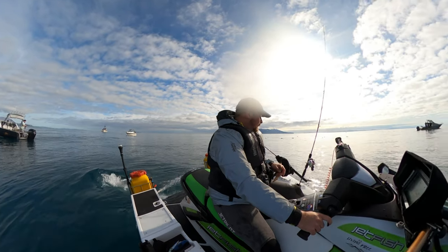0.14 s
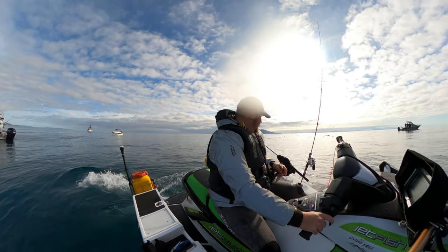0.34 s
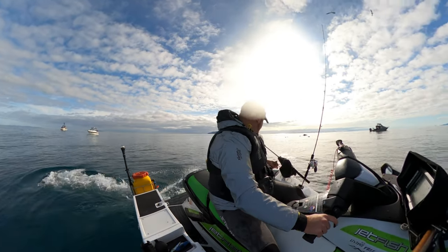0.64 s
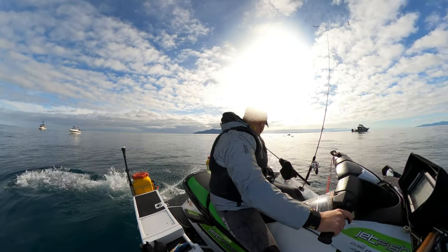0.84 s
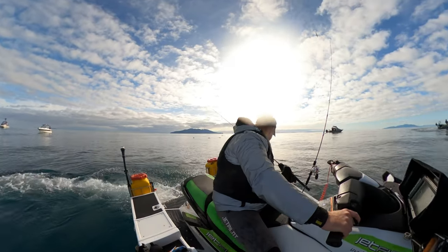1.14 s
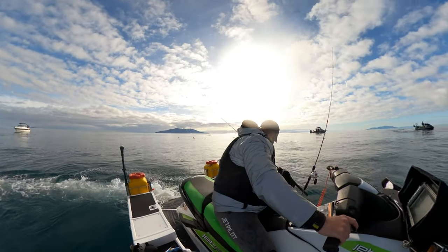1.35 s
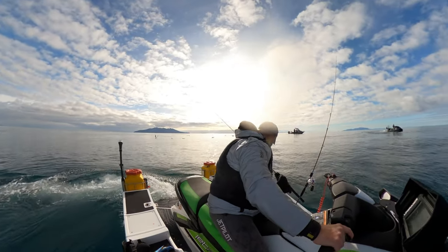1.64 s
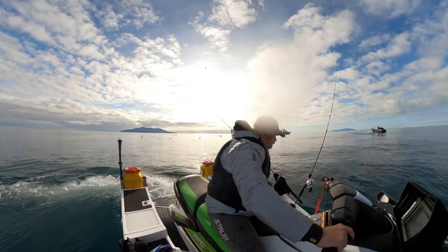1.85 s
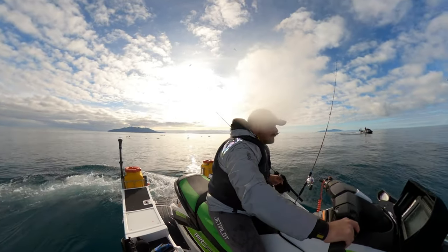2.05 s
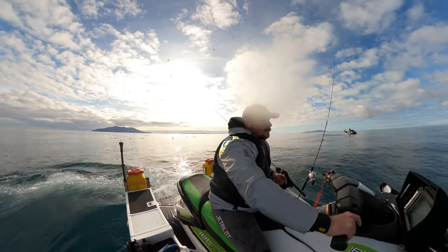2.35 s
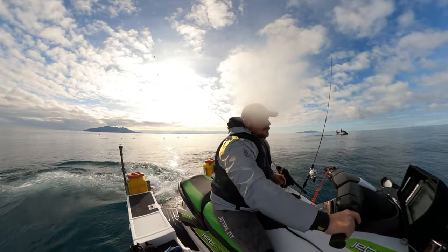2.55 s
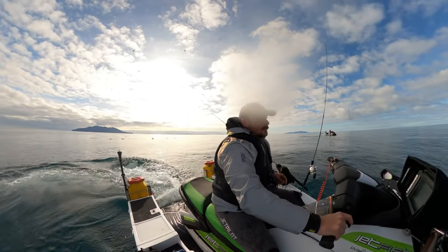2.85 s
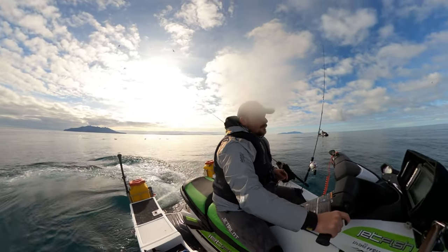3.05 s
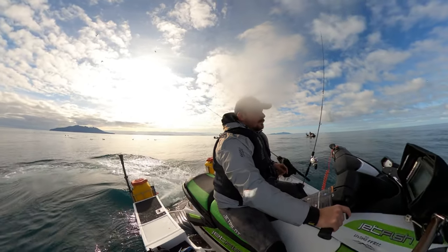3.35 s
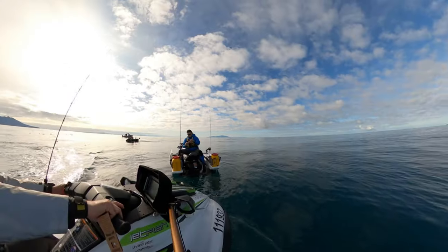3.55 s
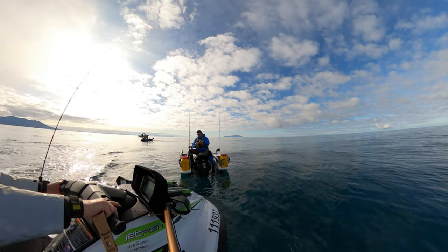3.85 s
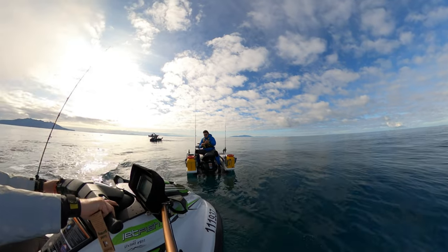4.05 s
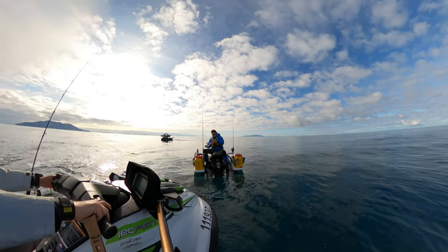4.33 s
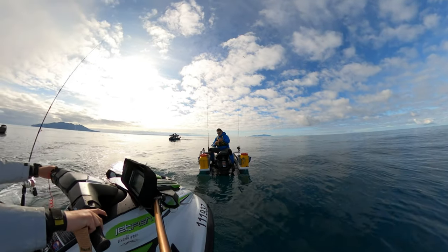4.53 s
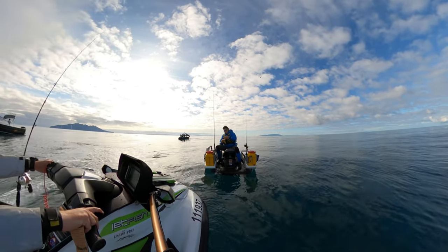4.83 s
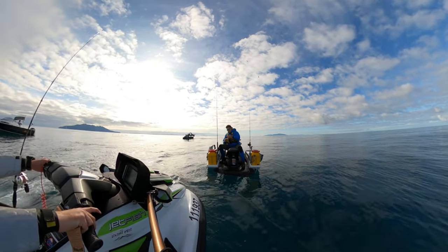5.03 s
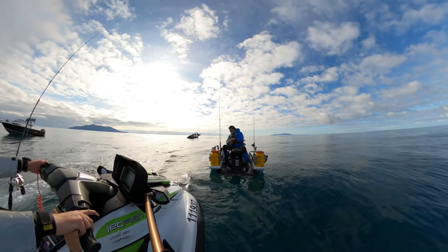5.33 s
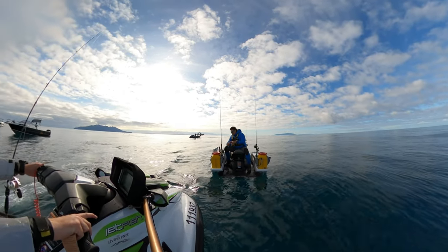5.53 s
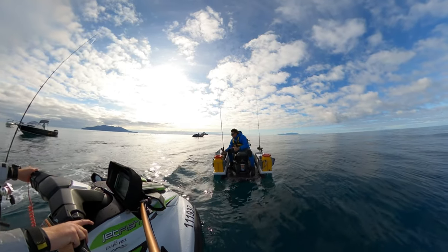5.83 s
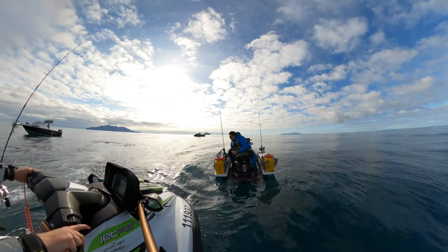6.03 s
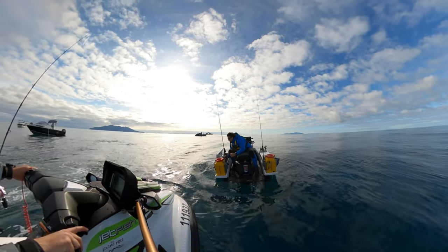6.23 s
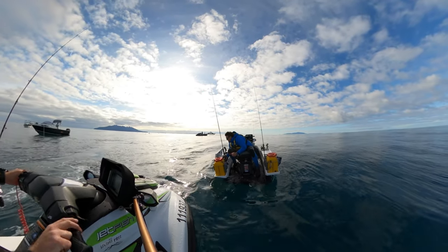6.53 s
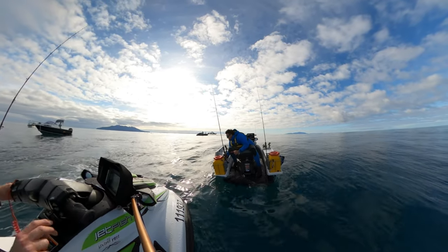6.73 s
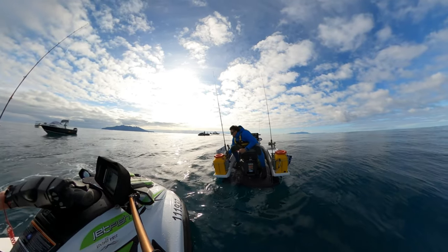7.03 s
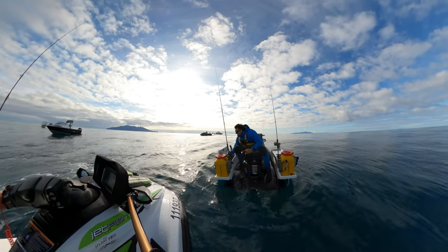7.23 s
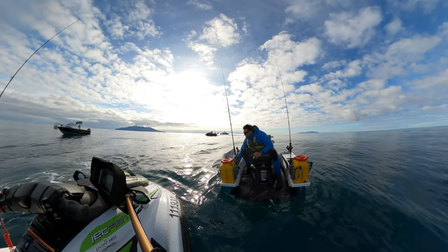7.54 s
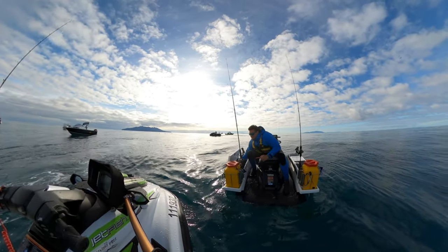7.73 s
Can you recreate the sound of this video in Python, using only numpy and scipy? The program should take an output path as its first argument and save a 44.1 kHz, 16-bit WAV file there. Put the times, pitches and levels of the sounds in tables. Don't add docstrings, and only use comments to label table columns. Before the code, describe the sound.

Close on open water, a jet-driven craft hums loudly, slows, thumps a wave, surges, then fades into a low gurgling idle with small hull slaps.

```python
import sys
import numpy as np
from scipy import signal
from scipy.fft import rfft, irfft, next_fast_len
from scipy.io import wavfile
from scipy.ndimage import uniform_filter1d

SR = 44100
rng = np.random.default_rng(int(sys.argv[2]) if len(sys.argv) > 2 else 0)


def wrap_up_sound(samples):
    columns = np.atleast_2d(samples).T
    tamed = np.clip(columns, -1, 1)
    steps = np.round(tamed * 32767).astype(np.int16)
    wavfile.write(sys.argv[1], SR, steps)


def boost(x):
    u = np.asarray(x, float) / 20
    return 10 ** u


N = 347508
TIME = np.arange(N) / SR


def rms_one(x):
    return x / np.sqrt(np.mean(x ** 2) + 1e-20)


def in_time(rows):
    seconds, *columns = np.transpose(rows)
    return [np.interp(TIME, seconds, column) for column in columns]


def drift(rate_hz):
    r = np.exp(-80 * np.pi * rate_hz / SR)
    noise = rng.standard_normal(N // 40 + 2002)
    slow = signal.lfilter([1], [1, -2 * r, r * r], noise)[2000:]
    return np.interp(np.arange(N) / 40, np.arange(len(slow)), rms_one(slow))


def ring(x, hz, width_hz):
    r = np.exp(-np.pi * width_hz / SR)
    top = np.array([1, 0, -1]) * (1 - r * r) / 2
    return signal.lfilter(top, [1, -2 * r * np.cos(2 * np.pi * hz / SR), r * r], x)


def passed(x, low_hz, high_hz, order=2):
    return signal.sosfilt(signal.butter(order, [low_hz, high_hz], "band", fs=SR, output="sos"), x)


def coloured(spectrum, size, patchy_db=0):
    hz, db = np.transpose(spectrum)
    edges = np.geomspace(hz[0], hz[-1], int(3.5 * np.log2(hz[-1] / hz[0])))
    white = rng.standard_normal((2, size))
    out = 0
    for k, (low, high) in enumerate(zip(edges, edges[1:])):
        level_db = np.interp(np.log(low * high) / 2, np.log(hz), db)
        flicker_db = patchy_db * drift(14)[:size]
        out = out + boost(level_db + flicker_db) * passed(white[k % 2], low, high)
    return rms_one(out)


# time in seconds, hiss level in dB.
GRILLE_AIR = [(0.0, -76), (1.25, -76), (2.0, -80), (2.57, -76), (3.25, -75.5), (4.25, -90), (4.72, -87.5),
              (5.3, -88.5), (6.61, -80.5), (7.88, -82)]


def grille():
    hiss_db = in_time(GRILLE_AIR)[0]
    white = rng.standard_normal(N)
    cavity = boost(1.5 * (hiss_db + 74)) * ring(white, 12400, 1100)
    hiss = passed(white, 8000, 13000) + cavity
    return boost(hiss_db + 2.5 + 1.2 * drift(9)) * rms_one(hiss)


# time of the peak in seconds, peak level in dB.
WIND_GUSTS = [(1.45, -43), (1.659, -24), (2.1, -32), (3.2, -40), (3.75, -30.5), (4.2, -29), (4.55, -23.5),
              (4.851, -26), (5.15, -27.5), (5.38, -31.5), (5.63, -39), (6.0, -31.5), (6.2, -45),
              (7.35, -30), (7.6, -39)]
CALM_DB, GUST_RISE_S, GUST_FALL_S = -43.5, 0.12, 0.14


def wind():
    power = boost(2 * CALM_DB)
    for s, db in WIND_GUSTS:
        spread_s = np.where(TIME < s, GUST_RISE_S, GUST_FALL_S)
        power = power + boost(2 * db) * np.exp(-((TIME - s) / spread_s) ** 2)
    rumble = boost(4.3 * drift(4.1)) * passed(rng.standard_normal(N), 21, 52)
    return np.sqrt(power) * rms_one(rumble)


# pitch in Hz, level in dB per Hz.
SPRAY_COLOUR = [(900, -9), (1300, -0.5), (1700, -2), (3000, -8), (4700, -13), (5150, -9), (6500, -15.5),
                (7400, -15), (16000, -13)]


def spray():
    return rms_one(boost(0.72 * drift(30)) * coloured(SPRAY_COLOUR, N, patchy_db=1.6))


def lapping():
    sizes = boost(2.2 * np.minimum(rng.exponential(1, N), 4)) * rng.choice([-1, 1], N)
    born = rng.random(N) < 800 * boost(3.5 * drift(8)) / SR
    pitches = np.geomspace(550, 5000, 16)
    dealt = rng.integers(0, 16, N)
    plops = 0
    for k, hz in enumerate(pitches):
        bubbles = sizes * born * (dealt == k) + 1e-18
        plop = ring(ring(bubbles, hz, 1.5 * hz), hz, 0.083 * hz)
        plops = plops + plop * (450 / hz) ** 1.04
    return rms_one(plops)


# start in seconds, length in seconds, level in dB.
HULL_SLOSHES = [(1.048, 0.12, -40), (1.186, .08, -41), (3.791, 0.067, -42), (4.59, 0.14, -35),
                (4.92, 0.087, -48), (5.593, 0.049, -53), (6.063, .17, -41), (6.285, 0.25, -45.5),
                (6.57, 0.12, -48.5), (7.247, .1, -64), (7.398, .05, -45), (7.55, 0.051, -43)]
SLOSH_RISE_S, SLOSH_FALL_S, SLOSH_LOW_HZ, SLOSH_HIGH_HZ = 0.02, 0.051, 380, 2440


def sloshes(plops):
    wash = passed(plops + 1.1 * rng.standard_normal(N), SLOSH_LOW_HZ, SLOSH_HIGH_HZ)
    strength = 0
    for s, length_s, db in HULL_SLOSHES:
        rise = (TIME - s) / SLOSH_RISE_S + 0.5
        fall = (s + length_s - TIME) / SLOSH_FALL_S + 1
        strength = strength + boost(db) * np.clip(np.minimum(rise, fall), 0, 1)
    return strength * rms_one(wash)


# time in seconds, jet spray level in dB, lapping level in dB.
WATER_LEVELS = [(0.0, -58, -56.5), (0.15, -53.5, -47.5), (0.75, -55, -50.5), (1.03, -56.5, -47),
                (1.67, -50.5, -40), (2.02, -49.5, -42.5), (2.48, -42, -43), (3.25, -42, -54),
                (3.62, -46.5, -47.5), (3.88, -42, -37.5), (4.1, -46.5, -44.5), (5.22, -46, -48),
                (5.62, -59.5, -56), (5.97, -64.5, -53.5), (6.35, -58, -49.5), (7.2, -57.5, -54.5),
                (7.5, -52, -56), (7.88, -58, -55)]


def water():
    spray_db, lapping_db = in_time(WATER_LEVELS)
    plops = lapping()
    return boost(spray_db + 7.0) * spray() + boost(lapping_db) * plops + sloshes(plops)


# start in seconds, peak in dB, ring pitch in Hz, level of the splash on top in dB.
HULL_SLAPS = [(0.164, -11.5, 577, -50), (1.037, -9.5, 535, -66.5), (1.209, -7, 575.3, -46.5),
              (1.428, -19, 713.5, -53), (1.751, -10, 555.8, -37.5), (1.943, -13, 760, -57),
              (3.307, -27.5, 764.3, -34), (3.826, -8, 614.8, -37), (4.284, -15, 1667, -58.5),
              (5.847, -22, 584.3, -45.5), (6.052, -14, 700, -67), (6.135, -11, 1400, -60),
              (6.164, -21, 674, -46), (6.201, -18, 754, -49), (6.479, -22, 705.7, -55),
              (6.609, -41, 560, -42), (6.829, -40, 795.6, -48.5), (7.119, -43, 737, -45),
              (7.289, -18, 745, -56), (7.392, -31, 941, -43.5), (7.427, -17, 600, -44),
              (7.564, -11.5, 568.6, -50), (7.571, -8, 920, -50), (6.305, -20, 874, -58),
              (7.329, -13, 558, -57), (6.149, -13, 606, -57)]


def slaps():
    out = np.zeros(N + 2000)
    t = np.arange(2000) / SR
    noise = rng.standard_normal((len(HULL_SLAPS), 2000))
    for (s, peak_db, hz, splash_db), hiss in zip(HULL_SLAPS, noise):
        rising = np.sin(2 * np.pi * hz * (t + 12 * t * t))
        plop = rising * np.exp(-t * hz / 2.0) * (1 - np.exp(-t / 0.00014))
        splash = passed(hiss, 1000, 5500, order=1) * np.exp(-t / 0.013) * (1 - np.exp(-t / 0.00081))
        out[round(s * SR):][:2000] += boost(peak_db - 9.0) * plop + boost(splash_db + 7.5) * splash
    return out[:N]


# pitch in Hz, level in dB, time to die by 60 dB in seconds.
HULL_BOOMS = [(83, -1.5, 0.12), (145, -3.5, 0.11), (184.5, 5, 0.083), (238, -16, 0.19), (421, -15, 0.22),
              (529, -35, .04)]
# pitch in Hz, level in dB per Hz.
CRUNCH_COLOUR = [(250, -14), (350, -5), (760, -11), (1500, -19), (2300, -21), (3500, -32.5), (6300, -36.5),
                 (16000, -34.5)]
THUMP_S, THUMP_DB, CRUNCH_DB, CRUNCH_S = 1.707, 1.5, -11, 0.019


def thump():
    t = np.arange(SR // 2) / SR
    burst = (1 - np.exp(-t / 0.00043)) / (1 + np.exp((t - CRUNCH_S) / 0.012))
    crunch = boost(CRUNCH_DB) * burst * coloured(CRUNCH_COLOUR, len(t))
    late = np.maximum(t - 0.006, 0)
    swell = 1 - np.exp(-late / 0.0038)
    boom = sum(boost(db - 60 * late / t60) * np.sin(2 * np.pi * hz * late) for hz, db, t60 in HULL_BOOMS)
    out = np.zeros(N)
    out[round(THUMP_S * SR):][:len(t)] = crunch + boost(THUMP_DB) * swell * boom
    return out


# start in seconds, peak in dB, ring pitch in Hz.
GAS_BUBBLES = [(5.152, -8, 112.2), (5.309, -13, 113), (5.344, -17, 125), (5.655, -13, 100.8),
               (5.799, -27, 109.3), (6.414, -14.5, 145), (6.544, -15, 173), (6.574, -15, 93),
               (6.635, -19, 99.6), (6.684, -14, 100), (7.154, -13, 154.3), (1.055, -17, 470),
               (1.205, -15, 484), (3.795, -14, 290), (3.835, -15, 400), (4.93, -22, 460), (6.147, -14, 302),
               (7.564, -5, 350)]


def glugs():
    out = np.zeros(N + 3000)
    t = np.arange(3000) / SR
    for s, peak_db, hz in GAS_BUBBLES:
        fading = np.exp(-t * hz / 1.18) * (1 - np.exp(-t / 0.0015))
        out[round(s * SR):][:3000] += boost(peak_db - 1.5) * np.sin(2 * np.pi * hz * t) * fading
    return out[:N]


# pitch in Hz, width in Hz, level in dB.
BOX_RESONANCES = [(62.5, 7.7, -12), (100, 50.6, -3), (159, 86, -1.5), (226, 79, -2.5), (322.4, 100, -5),
                  (440, 140, -23)]
# pitch in Hz, level in dB per Hz.
ROAR_COLOUR = [(240, -27.5), (400, 5), (419, -11), (488, -9), (586, -13.5), (965, -17.5), (1280, -21),
               (3500, -46), (4550, -73.5), (7700, -120)]
ROAR_DB, ROAR_DB_PER_OCTAVE, ROAR_FOLLOWS_GAS = -34.5, 12, 0.21
ROAR_DB_PER_SURGE, SURGE_SMOOTH_S = 2.5, 0.13


def exhaust(firings, crank_hz, gas_db):
    roar_db = ROAR_DB + ROAR_DB_PER_OCTAVE * np.log2(crank_hz / 45) + ROAR_FOLLOWS_GAS * (gas_db + 24)
    lag = np.exp(-1 / (SURGE_SMOOTH_S * SR))
    surge = signal.lfilter([1 - lag], [1, -lag], np.gradient(crank_hz) * SR / 100)
    roar_db = roar_db + ROAR_DB_PER_SURGE * np.clip(surge, -1.5, 2.5)

    at = np.flatnonzero(np.diff(np.floor(firings)) > 0)
    chance = rng.standard_normal((len(at), 2))
    late = (0.0025 * SR * chance[:, 0]).astype(int)
    slugs = np.zeros(N)
    slugs[np.clip(at + late, 0, N - 1)] = 0.44 + np.tanh(chance[:, 1])
    slugs *= 1 / np.sqrt(uniform_filter1d(np.abs(np.gradient(firings)), size=2001))
    gurgle = rms_one(slugs) + 1.88 * rng.standard_normal(N)

    opening_db = 0.31 * (gas_db + 22)
    burble = 0
    for k, (hz, width_hz, db) in enumerate(BOX_RESONANCES):
        strength = (-1) ** k * boost(db + opening_db * np.log2(hz / 160)) / np.sqrt(width_hz)
        burble = burble + strength * ring(ring(gurgle, hz, 2.12 * width_hz), hz, width_hz)

    gate = 1 + 0.21 * np.cos(2 * np.pi * firings)
    roar = gate * boost(1.1 * drift(9)) * coloured(ROAR_COLOUR, N, patchy_db=2.0)
    return boost(gas_db + 0.5) * rms_one(burble) + boost(roar_db + 1.87) * rms_one(roar)


# pitch in Hz, gain in dB.
HULL_PASSES = [(40, -23.5), (70, -4.5), (105, -0.5), (200, 0.34), (280, -5), (350, -1.5), (390, 1),
               (520, -7.5)]
ORDERS = (2, 3, 4, 5, 6, 7, 8)
ORDER_SHAKE = (0.11, 0.93, 1, 1, -0.12, .3, 0.62)
CRANK_SHAKE_DB = -47


def drone(controls, order_db, wobble_db):
    crank_hz, load_db, gas_db, shake_db = controls
    turns = 0.17 + np.cumsum(crank_hz * (1 + 0.002 * drift(9))) / SR
    hull_hz, hull_db = np.transpose(HULL_PASSES)
    levels = []
    for k, db, share in zip(ORDERS, order_db, ORDER_SHAKE):
        through_hull_db = np.interp(np.log(k * crank_hz), np.log(hull_hz), hull_db)
        levels.append((k, load_db + db + share * shake_db + through_hull_db))
    levels.append((0.92, np.minimum(CRANK_SHAKE_DB, load_db - 17)))
    out = 0
    for k, db in levels:
        flip = np.pi * (k > 5)
        wavering = boost(db + wobble_db * np.sqrt(k) * drift(9.1))
        out = out + wavering * np.cos(2 * np.pi * k * turns + flip)
    return np.sqrt(2) * out, 2 * turns


# time in seconds, crank turns a second (Hz), load in dB, exhaust gas in dB, hull shake in dB.
CRUISE = [(0.0, 55.5, -11, -20, 1), (0.33, 53.46, -12, -26, 3.5), (0.72, 55.13, -11.5, -25, 1),
          (0.83, 51.8, -9, -27, -9), (1.16, 48.7, -14, -25, -7), (1.32, 44.9, -11.5, -22, -9),
          (1.43, 41.17, -17, -18.5, 5.5), (1.57, 38.06, -21.5, -31, 2), (1.95, 33.75, -19, -29.5, -1.5),
          (2.04, 35.36, -27, -25.5, 5.5), (2.11, 44.97, -21, -32, 7), (2.17, 50.5, -10.5, -32, -12.5),
          (2.27, 59.97, -14, -26, 8.5), (2.36, 65.77, -9.5, -20, 0.5), (2.45, 68, -12, -22, 3.5),
          (2.63, 66.03, -10, -22, 2), (2.9, 64.42, -8.5, -25.5, -7), (3.3, 65.12, -9.5, -28.5, -6)]
CRUISE_ORDERS_DB = (0.9, -12.5, -9.5, -23, -15, -38.5, -24)


def under_way():
    controls = np.array(in_time(CRUISE))
    return controls, *drone(controls, CRUISE_ORDERS_DB, wobble_db=0.85)


# time in seconds, crank turns a second (Hz), load in dB, exhaust gas in dB, hull shake in dB.
IDLE = [(3.3, 38.74, -14, -32.5, -9), (3.55, 34.68, -15.5, -32, -2), (3.74, 29.93, -24.5, -30.5, 7),
        (3.99, 34.99, -15, -31.5, -3), (4.14, 34.33, -18, -39, -1.5), (4.44, 29.36, -23, -30, 1),
        (5.03, 31.51, -24.5, -28, -0.5), (5.3, 29.58, -26, -34.5, -0.5), (5.78, 26.01, -33, -36, 3.5),
        (6.5, 22.91, -33.5, -36, 2.5), (6.56, 22.51, -34, -31, 8), (6.77, 22.53, -37.5, -28.5, 14.5),
        (6.86, 27.46, -25.5, -34, 4), (7.03, 30.33, -25.5, -37, 4), (7.2, 36.35, -25, -32.5, -9.5),
        (7.36, 38.8, -23, -33, -5.5), (7.52, 39.5, -27, -27, -4), (7.88, 29.12, -28.5, -40.5, -2.5)]
# time in seconds, added crank Hz, added load in dB, added gas in dB, added shake in dB.
THROTTLE_BLIP = [
    (4.49, 0, -0.5, 3.5, -0.5),
    (4.525, 1.5, 6.5, 6, 2.5),
    (4.57, 6, 2.5, 5, 3.5),
    (4.625, 29, -1.5, 8, 3.5),
    (4.68, 29, 2, 13.5, 13),
    (4.76, 21.5, 4, 17, -1),
    (4.82, 10, 4, 15, 2),
    (4.87, 4.5, 4, 2, -1.5),
    (4.93, 0, -0.5, 1.5, 1),
]
IDLE_ORDERS_DB = (3, -10.5, -4, -19, -9, -20, -19.5)


def idling():
    controls = np.array(in_time(IDLE)) + in_time(THROTTLE_BLIP)
    return controls, *drone(controls, IDLE_ORDERS_DB, wobble_db=1.34)


FADE_START_S, FADE_S = 3.36, 0.38


def scene():
    controls_first, first, firings_first = under_way()
    controls_second, second, firings_second = idling()
    fade = np.clip((TIME - FADE_START_S) / FADE_S, 0, 1)
    firings = np.where(fade < 0.5, firings_first, firings_second)
    crank_hz, load_db, gas_db, shake_db = (1 - fade) * controls_first + fade * controls_second
    engine = (1 - fade) * first + fade * second + exhaust(firings, crank_hz, gas_db)
    return (wind() + water() + slaps() + thump() + glugs() + engine)[None]


def top_cut(x):
    return signal.sosfilt(signal.butter(12, 15720, fs=SR, output="sos"), x)


# pitch in Hz, gain in dB.
HOUSING = [(20, -0.5), (7600, -4), (8100, -10), (8800, -15.5), (9700, -19.5), (11000, -29.5),
           (13300, -33.5), (15700, -36)]


def record(dry):
    hz, db = np.transpose(HOUSING)
    size = next_fast_len(N)
    gain = boost(np.interp(np.fft.rfftfreq(size, 1 / SR), hz, db))
    heard = irfft(rfft(dry, size) * gain, size)[:, :N] + grille()
    clipped = heard / (1 + np.abs(heard) ** 6) ** (1 / 6)
    return top_cut(clipped)


dry = scene()
out = record(dry)
wrap_up_sound(out)
```